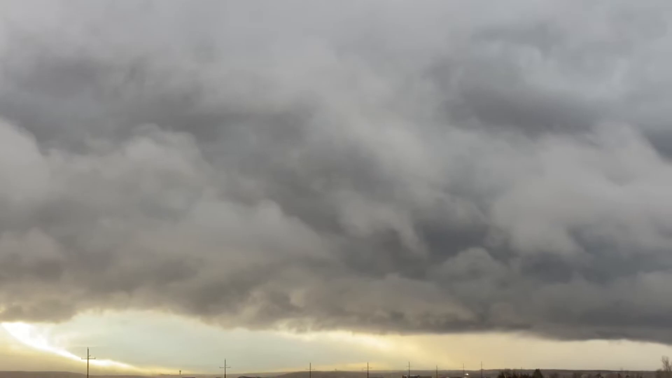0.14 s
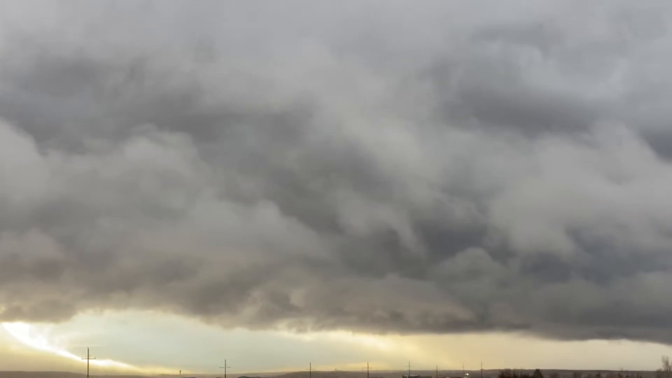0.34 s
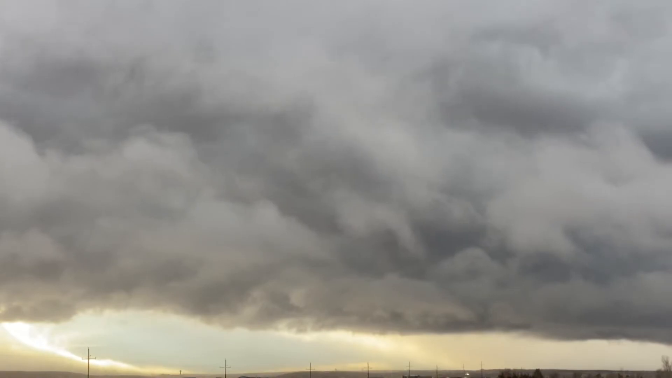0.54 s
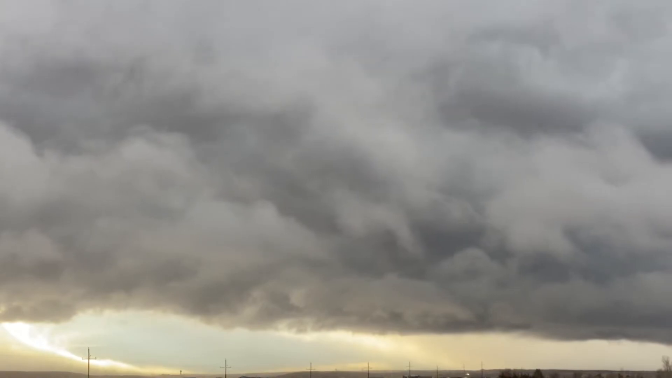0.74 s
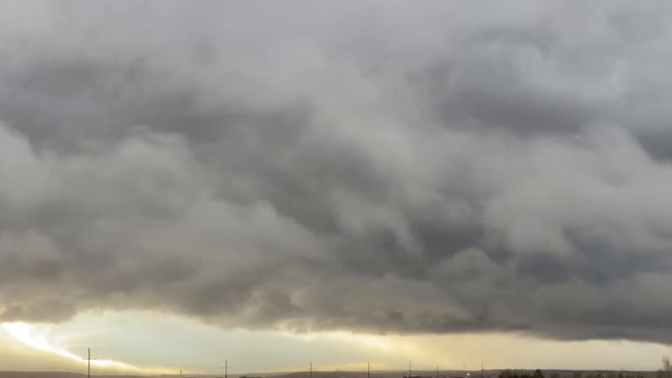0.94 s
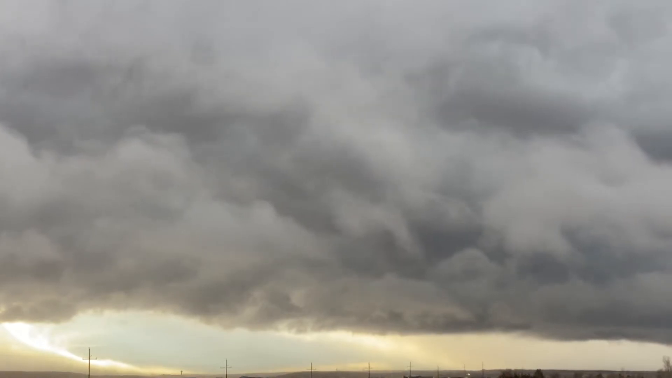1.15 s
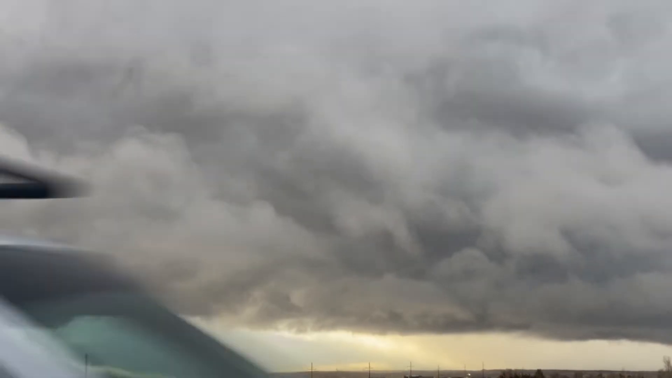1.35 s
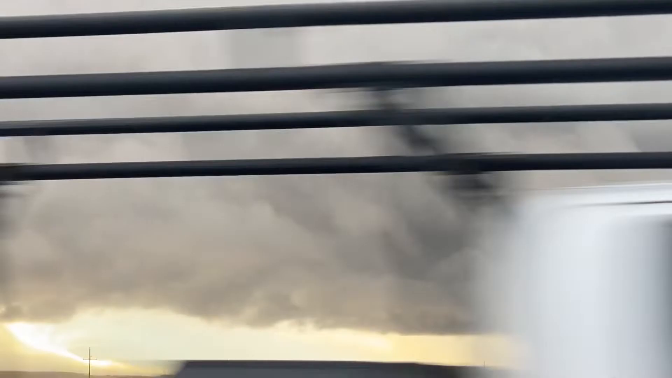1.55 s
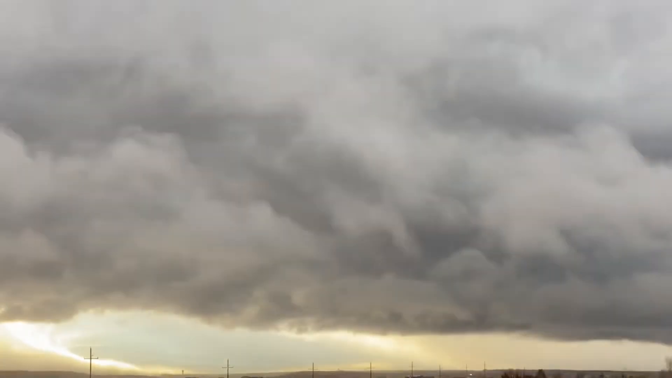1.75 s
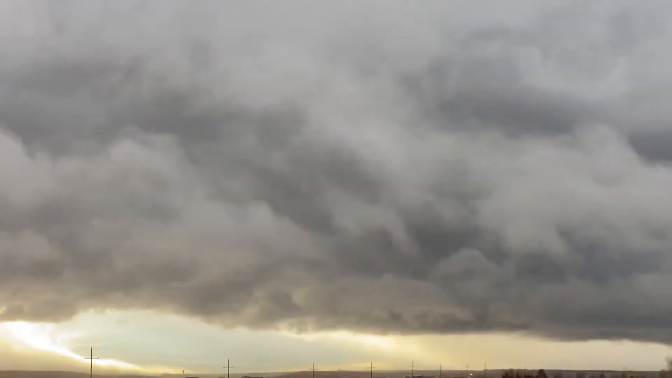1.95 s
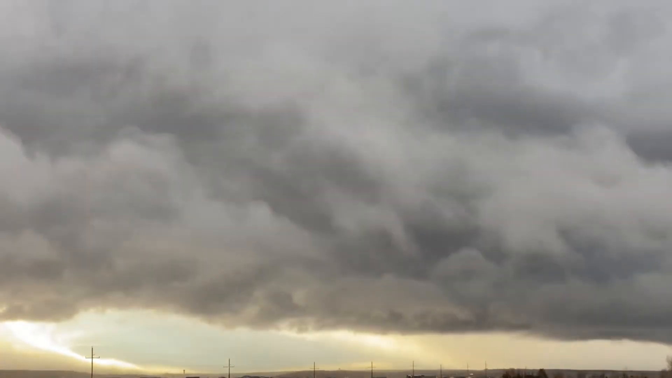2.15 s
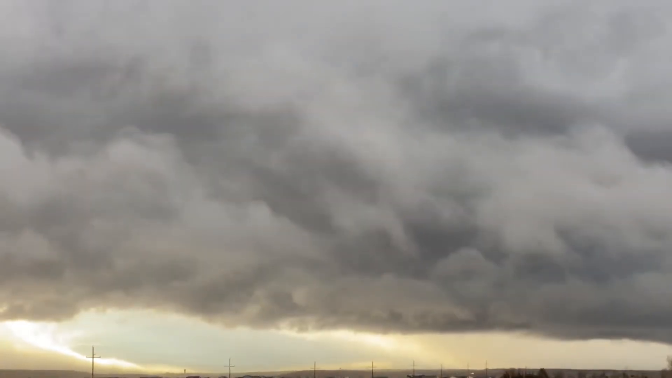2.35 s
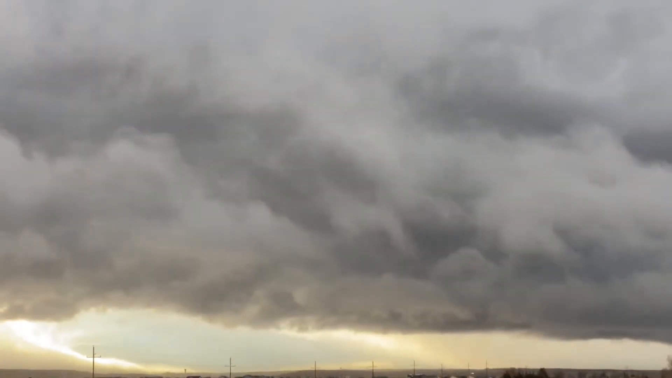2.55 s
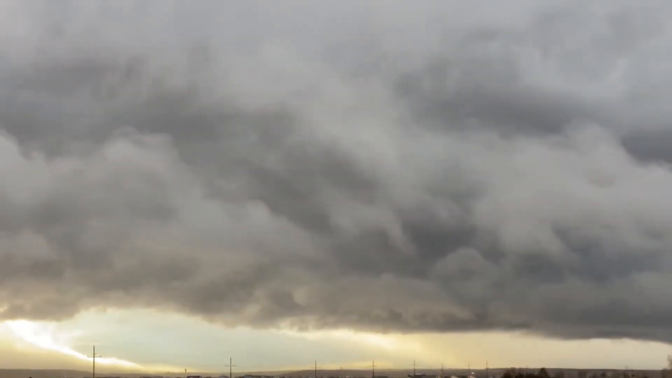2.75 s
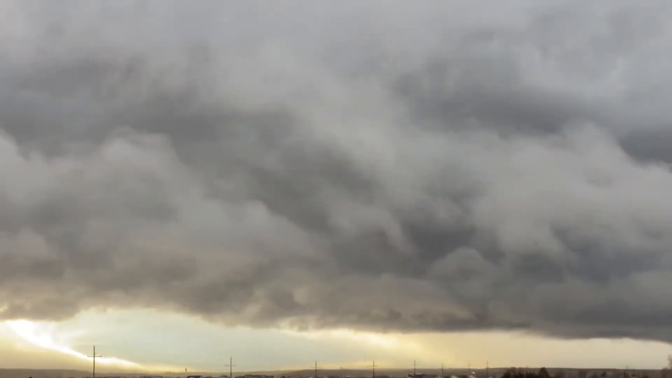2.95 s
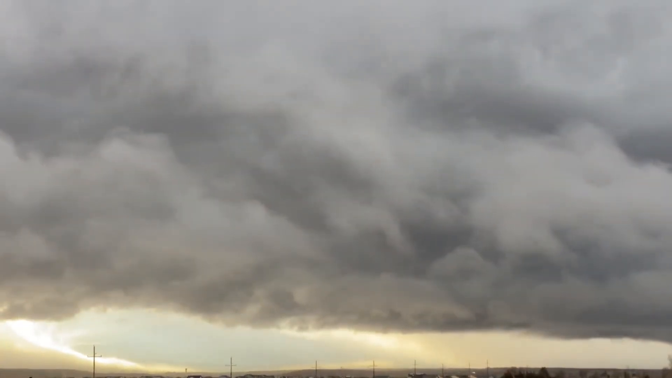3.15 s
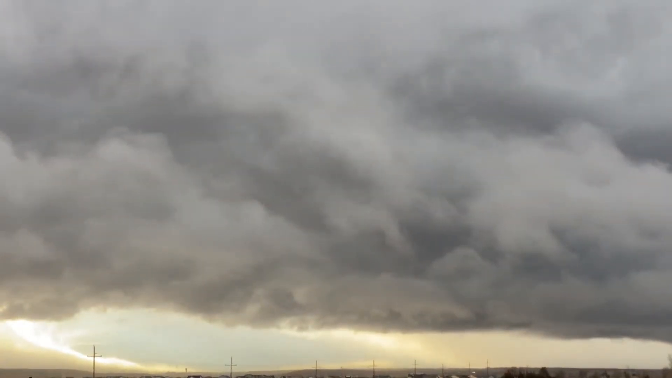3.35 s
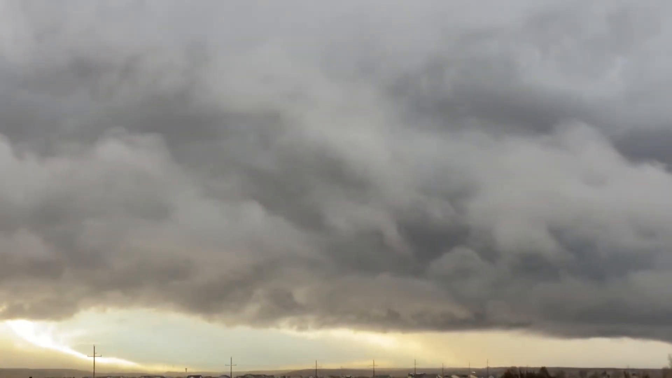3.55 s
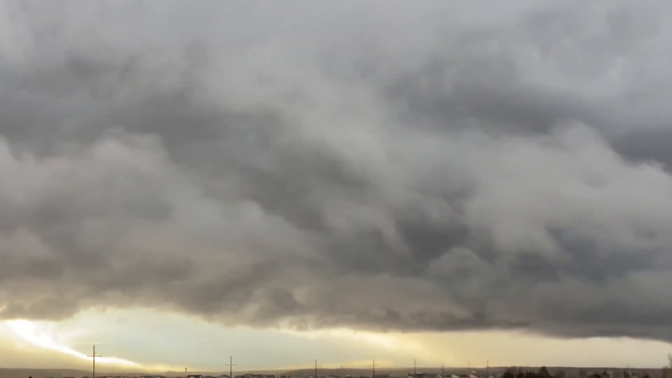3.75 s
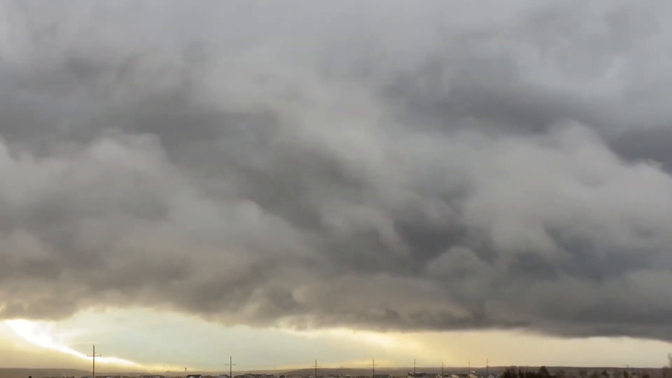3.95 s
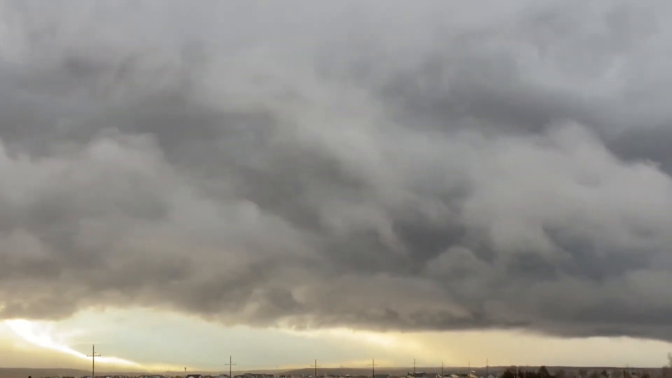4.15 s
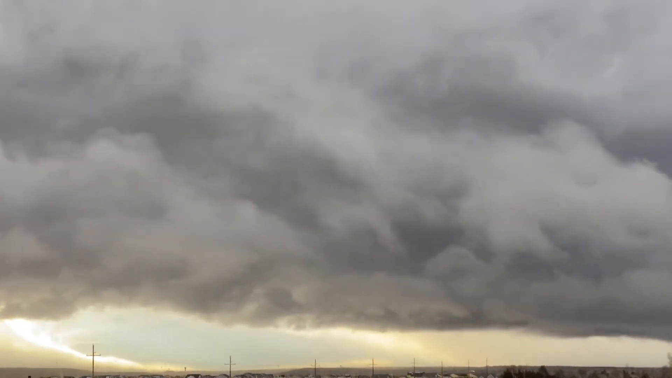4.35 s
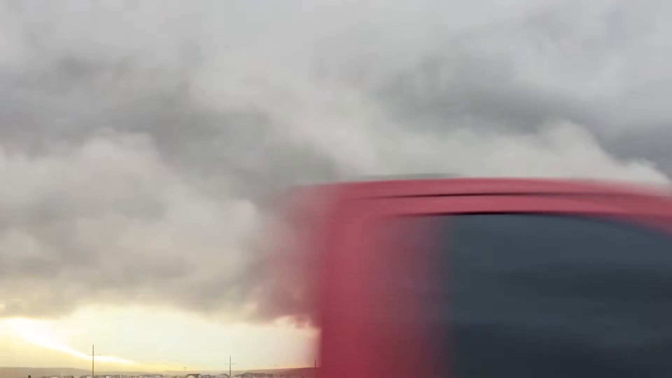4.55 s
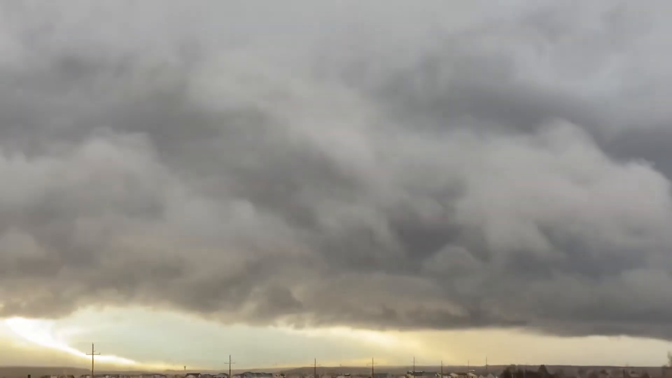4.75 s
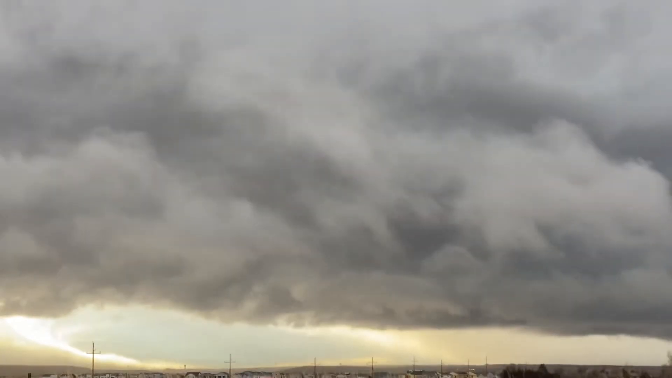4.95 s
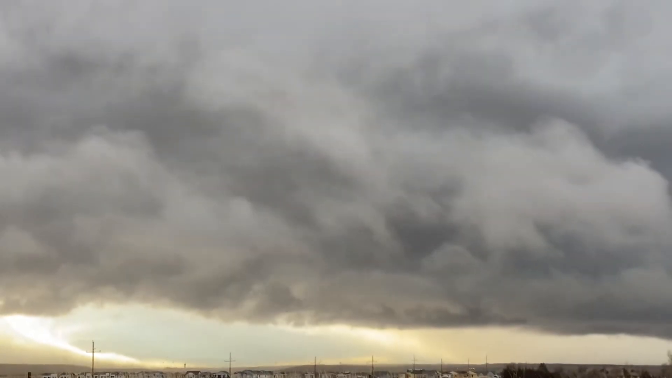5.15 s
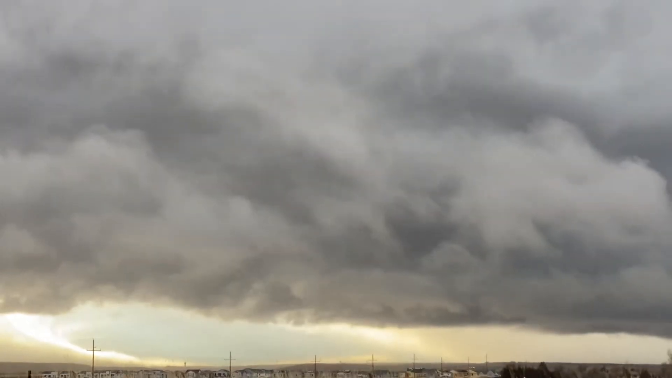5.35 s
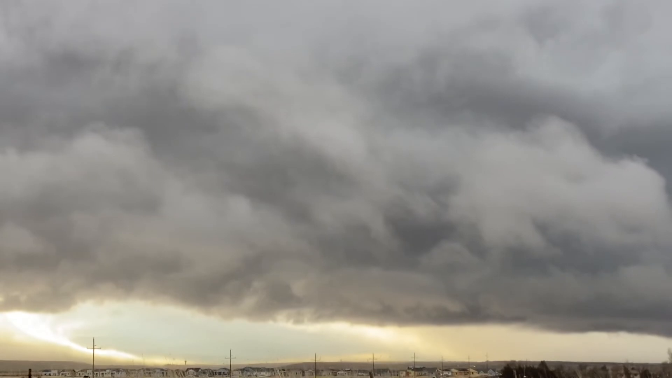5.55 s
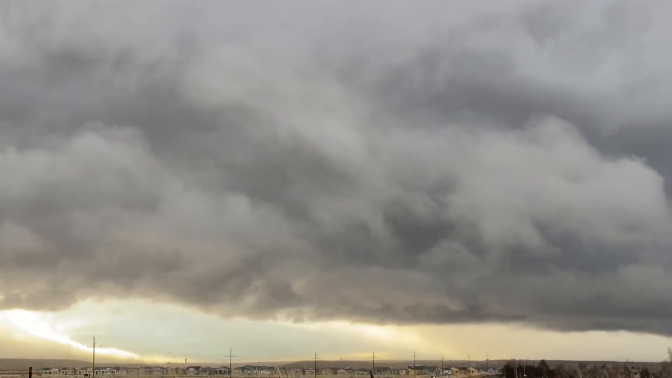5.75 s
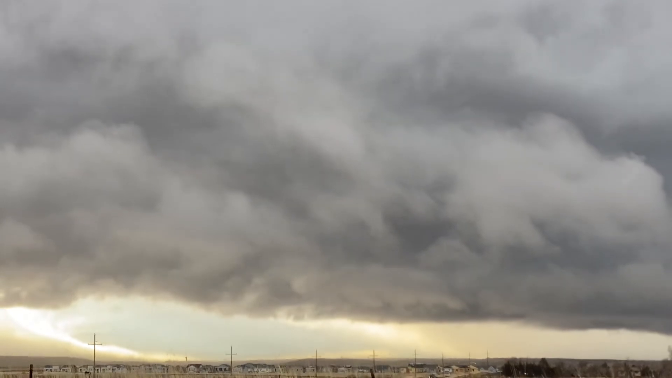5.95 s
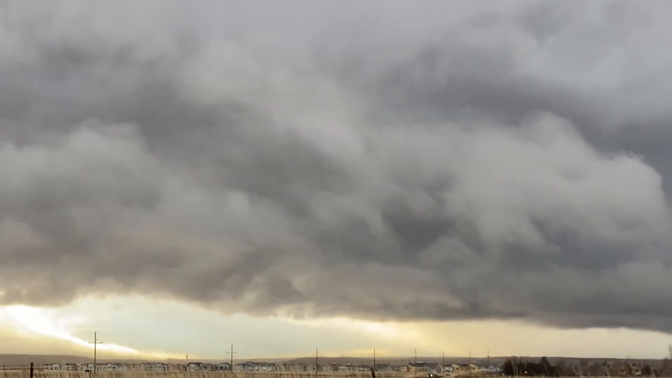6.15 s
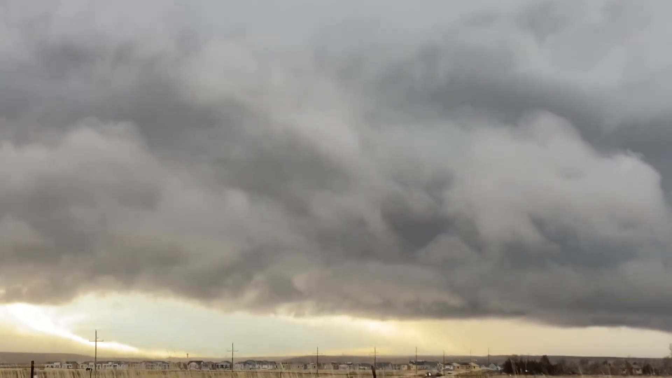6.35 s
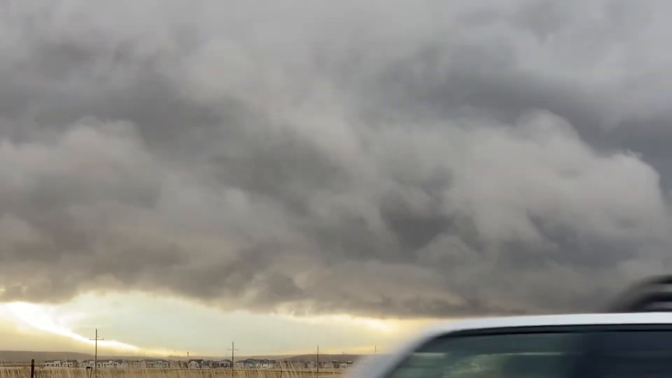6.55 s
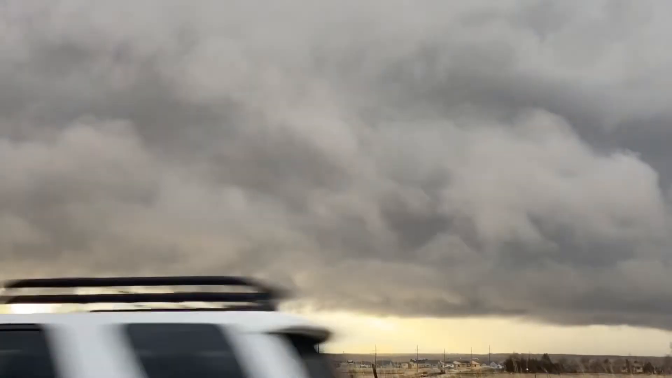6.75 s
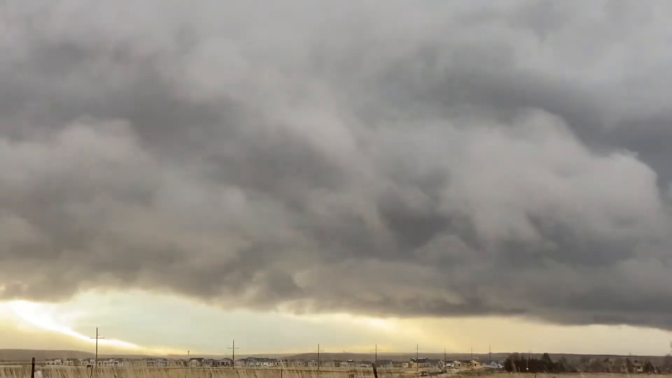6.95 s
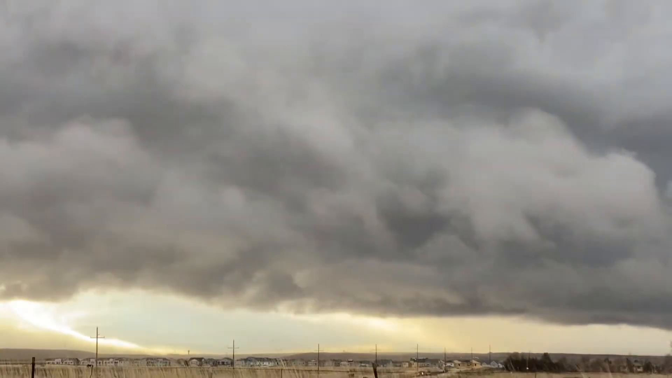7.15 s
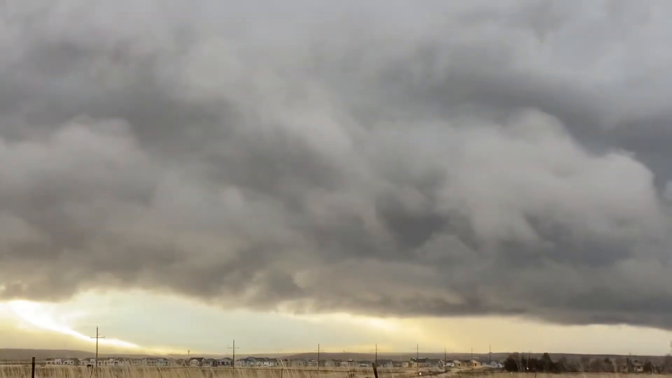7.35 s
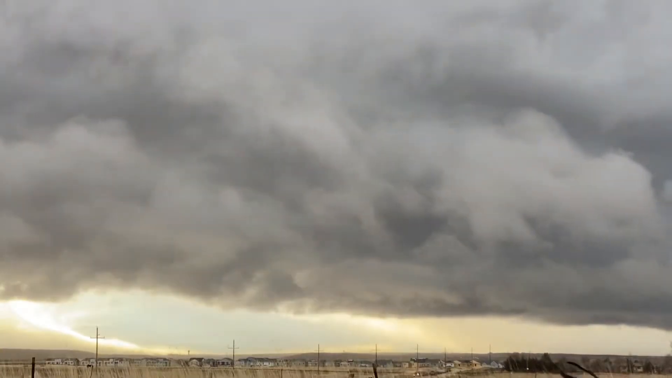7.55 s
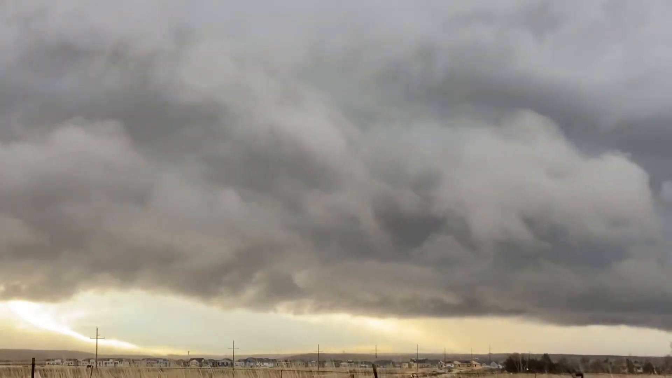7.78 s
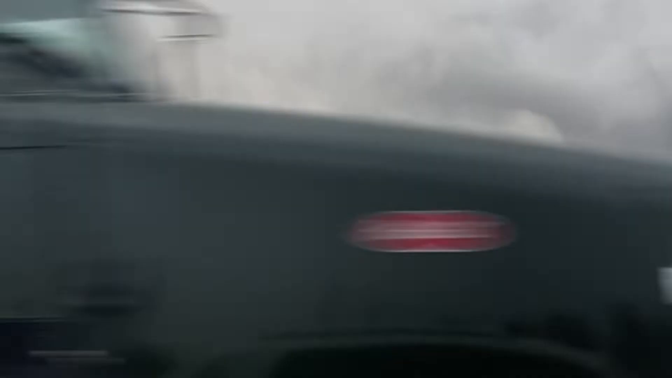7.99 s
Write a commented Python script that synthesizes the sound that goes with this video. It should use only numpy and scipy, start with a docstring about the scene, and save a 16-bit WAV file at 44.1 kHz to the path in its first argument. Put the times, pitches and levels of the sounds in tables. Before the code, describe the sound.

Windy open country beside a road, heard in stereo from a microphone close to the near lane. Soft wind knocks and a faint hollow traffic wash open under a growing tyre roar. A van rushes from left to right at about 1.5 s, with a low drone, a brief metallic stone ping and ticks of grit; swirling air and a low boom trail off. From 2 to 3.2 s gusts thud and knock against the microphone. A V8 hum rises from 3.5 s, bursting into a very loud boom around 4.5-4.7 s as the car passes rightwards; the level is clamped down for about a second. Its pitch falls and drops sharply with an upshift near 5.2 s, then it burbles away by 6.2 s. A softer car passes right to left around 6.5 s, fading slowly with a faint hum. Low wind remains, then a truck's roar and hiss swell rapidly, cutting off at its arrival around 8 s.

```python
"""Four vehicles come by a roadside microphone in windy open country, where gusts thump before and after
the first: a van, a car with a loud V8 that shifts up as it leaves, a car in the far lane going the other
way, and a truck just arriving. Tyres are coloured noise that swells and moves from side to side; engines
are wavering tones on multiples of the engine cycle; wind, grit and passing air are shaped noise, and each
thump is a short pressure swing. The V8 is so loud that the recorder turns everything down for about a second."""
import sys
import numpy as np
from scipy import signal
from scipy.fft import rfft, irfft, next_fast_len
from scipy.io import wavfile
from scipy.ndimage import uniform_filter1d, minimum_filter1d, map_coordinates

SR = 44100
rng = np.random.default_rng(int(sys.argv[2]) if len(sys.argv) > 2 else 0)


def log_audio(samples):
    """Write samples as a 16-bit WAV file to the path given in sys.argv[1]."""
    # one column per channel
    frames = np.atleast_2d(samples).T
    # limit to full scale, then quantise
    limited = np.clip(frames, -1, 1)
    pcm = np.round(limited * 32767).astype(np.int16)
    wavfile.write(sys.argv[1], SR, pcm)


N = 353637

# The passes: abreast t/s, time to cover its own distance from the microphone t/s, heading (+1 = to the right),
# body level/dB, tyres peak early by t/s, fade time as a multiple of swell time,
# roar level/dB, hiss level/dB (both before the trims in tyres), hiss swell t/s
PASSES = [(1.46, 0.19, 1, 0.5, 0.024, 0.99, -20, -44, 0.35),
          (4.52, .17, 1, -1, 0.057, 0.79, -16, -35.5, 0.19),
          (6.55, 0.25, -1, -12.5, 0.29, 2.96, -28.5, -52.5, 0.36),
          (8.1, 0.26, 1, -13, 0.0056, 1, -21.5, -35, 0.22)]
# Left channel against right, for sound from the left, abreast and right: f/Hz, left leads by/rad, left louder by/dB
LEFT_PORTS = [(60, .1, 0), (430, .45, -1), (540, 1.1, 0), (700, .9, -1), (850, 1.7, 3), (980, 1.2, 4),
              (1200, 2.9, 2), (1530, 5.75, -3), (1850, 5.6, -2), (2080, 6.283, 0)]
ABREAST_PORTS = [(100, 0, 0), (400, -.2, -1), (1100, .4, -1), (1750, -.5, -1), (2080, 0, 0)]
RIGHT_PORTS = [(60, -.1, 0), (300, -.7, 0), (480, -1.9, 2), (660, -2.5, 0), (800, -2.55, -3),
               (970, -2.35, -2), (1300, -2.65, -1), (1620, -2, -1), (1850, -.9, -3), (2080, 0, 0)]


def amp(db):
    """Decibels to gain."""
    return 10 ** (np.asarray(db) / 20)


def level_db(power):
    """Power to decibels."""
    return 10 * np.log10(power)


def unit(x):
    """Scale to rms 1."""
    return x / np.sqrt(np.mean(x ** 2) + 1e-20)


def along(points, hz):
    """Interpolate (f/Hz, value) points on a log frequency axis."""
    f, v = np.transpose(points)
    return np.interp(np.log(hz + 1), np.log(f + 1), v)


def clock():
    """The time of each sample in seconds."""
    return np.arange(N) / SR


def curves(rows):
    """One value per sample for each column after the time."""
    s, *columns = np.transpose(rows)
    return [np.interp(clock(), s, column) for column in columns]


def bell(s, length):
    """A smooth rise to 1 at s and back, down to 1/e after length seconds."""
    return np.exp(-((clock() - s) / length) ** 2)


def wobble(rate):
    """A smooth random curve with rate knots a second."""
    knots = rng.standard_normal(int(N * rate / SR) + 4)
    return map_coordinates(knots, [np.arange(N) * rate / SR])


def filtered(x, response):
    """Pass x through a complex response of frequency."""
    m = next_fast_len(N + SR // 4)
    return irfft(rfft(x, m) * response(np.fft.rfftfreq(m, 1 / SR)), m)[..., :N]


def ports(lead, hz):
    """Left and right responses for a phase lead and a level difference, half on each side."""
    rows, sides = np.array(lead), np.array([[.5], [-.5]])
    louder_db = along(rows[:, ::2], hz) if rows.shape[1] > 2 else 0
    return np.exp(1j * along(rows[:, :2], hz) * sides) * amp(louder_db * sides)


def rush(spectrum):
    """Coloured stereo noise of rms 1, least alike in the middle range: mid and side share the power."""
    # Likeness of the two channels: f/Hz, correlation
    likeness = [(50, .92), (150, .96), (500, .88), (1000, .84), (1250, .7), (1600, .62), (2150, .99),
                (4000, .999)]

    def mid_side(hz):
        turn = np.arccos(np.clip(along(likeness, hz), 0, 1)) / 2
        return amp(along(spectrum, hz)) * [np.cos(turn), np.sin(turn)]

    mid, side = filtered(rng.standard_normal((2, N)), mid_side)
    return unit(np.array([mid + side, mid - side]))


def passing(s, swell_s, db, falloff, linger=1):
    """Power of a source on a straight line, nearest at s; falloff 1 is the inverse square of distance."""
    t = clock() - s
    place = t / np.where(t < 0, swell_s, swell_s * linger)
    return amp(db) ** 2 / (1 + place ** 2) ** falloff


def bearings():
    """Power of the traffic from the left, abreast and the right, by inverse square of the distance."""
    power = np.zeros((3, N))
    for s, pace, heading, db, *_ in PASSES:
        place = np.sign(heading) * (clock() - s) / pace
        near = 1 / (1 + place ** 2)
        sides = np.array([(1 - near) * (place < 0), near, (1 - near) * (place > 0)])
        power += amp(db) ** 2 * near * sides
    return power


def placed(x, shares):
    """A low sound follows the traffic from side to side by the phase and level between the channels."""
    views = zip(shares, [LEFT_PORTS, ABREAST_PORTS, RIGHT_PORTS])
    return sum(share * filtered(x, lambda hz: ports(lead, hz)) for share, lead in views)


def distant():
    """Far tyres leave a hollow, steady wash between the passes, set to the right."""
    # Traffic far up the road: f/Hz, relative level/dB per Hz
    wash_colour = [(300, -50.5), (1000, -9.5), (1250, -2.5), (1550, 3.5), (1850, -3.5), (2000, -7),
                   (2250, -5), (2800, -22), (6000, -41.5), (16000, -82.5)]
    wash = filtered(rush(wash_colour), lambda hz: ports(RIGHT_PORTS, hz))
    return amp(-46.0 + 0.53 * wobble(3)) * wash


def wind():
    """Lumpy low noise: air buffets the microphone and comes and goes with the gusts."""
    # Gusts, and buffeting behind the vehicles: t/s, half length/s, level/dB before the trim below
    gust_rows = [(0.662, 0.22, -40), (1.797, 0.16, -30), (2.32, 0.2, -33), (3.038, 0.24, -32),
                 (3.497, 0.3, -34.5), (5.152, 0.25, -32), (6.796, 0.19, -44.5), (7.933, 0.35, -33)]
    # Buffeting at the microphone: f/Hz, relative level/dB per Hz
    rumble_colour = [(20, -23), (40, -3.5), (70, 2.5), (130, -2), (250, -4.5), (400, -22), (900, -43),
                     (4000, -120)]
    breeze = amp(-41 + 1.5 * wobble(5)) ** 2  # steady buffeting with a slow swing
    gusts = sum((amp(db) * bell(s, length)) ** 2 for s, length, db in gust_rows)
    buffet_db = level_db(breeze + gusts)
    lumps = amp(1.6 * wobble(14))
    return amp(buffet_db + 6.5) * lumps * rush(rumble_colour)


def thumps():
    """Each eddy is a brief pressure swing at the microphone: small ones knock, large ones thud."""
    # Eddies: t/s, f/Hz, peak level/dB before the bass leans to the right
    eddies = [(0.162, 330, -18), (0.171, 115, -20), (0.668, 330, -21), (0.675, 140, -19), (2.035, 115, -12),
              (2.214, 500, -22.5), (2.227, 175, -13.5), (2.279, 210, -12.5), (2.289, 500, -25.5),
              (2.29, 115, -17), (2.301, 95, -19), (2.343, 230, -10.5), (2.366, 210, -18), (2.382, 330, -21),
              (2.388, 560, -22), (2.402, 95, -14), (2.802, 270, -12), (2.817, 110, -10.5),
              (2.925, 110, -17), (3.04, 85, -17), (3.162, 80, -16.5)]
    cycles = .95  # swings either way until the eddy has fallen to 1/e
    return sum(amp(db) * bell(s, cycles / hz) * np.cos(2 * np.pi * hz * (clock() - s))
               for s, hz, db in eddies)


def slipstream(roar_db, closeness):
    """Bodies in the near lane tear the air into a low whoosh; its deepest part trails behind."""
    # Air torn by a passing body: f/Hz, relative level/dB per Hz
    body_colour = [(30, -27), (80, -15), (150, -3.5), (270, 1), (420, -4), (600, -21.5), (1200, -46.5),
                   (4000, -120)]
    # Large eddies behind it: f/Hz, relative level/dB per Hz
    trail_colour = [(20, -19.5), (45, -9), (80, 2), (140, -1), (220, -12), (400, -41.5), (900, -120)]
    body_db, trail_db, trail_lag_s = -1.8, -6.5, .14  # levels against the swell
    swell = amp(roar_db + 0.44 * wobble(17)) * closeness ** 0.25
    trailing = np.interp(clock() - trail_lag_s, clock(), swell)
    return amp(body_db) * swell * rush(body_colour) + amp(trail_db) * trailing * rush(trail_colour)


def wakes():
    """Swirling air follows the close passes in a short, uneven whoosh."""
    # Wakes in the near lane: t/s, half length/s, level/dB
    wake_rows = [(1.692, 0.16, -29), (4.717, 0.18, -27)]
    # Swirling air: f/Hz, relative level/dB per Hz
    swirl_colour = [(150, -9), (350, -2.5), (800, 3.5), (1300, -6), (2200, -9), (3500, -13.5),
                    (7000, -29.5), (15000, -43.5)]
    swell = sum(amp(db) * bell(s, length) for s, length, db in wake_rows)
    return swell * amp(2.8 * wobble(25.18)) * rush(swirl_colour)


def grit():
    """Flung stones tick around the van: decaying noise bands at each stone's pitch and a bright crack."""
    # Landings: t/s, stone f/Hz, stone level/dB, crack f/Hz, crack level/dB
    landings = [(0.829, 2200, -30, 4560, -47.5), (1.87, 3260, -35, 9800, -42),
                (2.039, 2700, -39, 7560, -46), (2.507, 2350, -45, 7800, -53), (2.785, 3000, -48, 7000, -47)]
    spread, t60_s = 1.2, .05  # band edges as a ratio to the centre, time to fall by 60 dB
    ticks, t = np.zeros(N), np.arange(SR // 20) / SR
    for s, hz, db, crack_hz, crack_db in landings:
        for centre, level in [(hz, db), (crack_hz, crack_db)]:
            band = signal.butter(2, [centre / spread, centre * spread], "band", fs=SR, output="sos")
            ring = unit(signal.sosfilt(band, rng.standard_normal(len(t))))
            ticks[round(s * SR):][:len(t)] += amp(level - 60 * t / t60_s) * ring
    return ticks


def ping():
    """One stone strikes metal under the van, which rings briefly as a decaying sine."""
    s, hz, db = 1.448, 5040, -25
    t60_s, attack_s = .04, .002
    t = np.maximum(clock() - s, 0)
    return amp(db - 60 * t / t60_s) * (1 - np.exp(-t / attack_s)) * np.sin(2 * np.pi * hz * t)


def narrow_bands():
    """Narrow noise bands of tread, bodywork and swirling air swell, glide and fade."""
    # Bands: t/s, half length/s, f/Hz, width/Hz, level/dB, glide/Hz per s
    bands = [(0.952, 0.33, 680, 300, -34.5, 0), (1.45, 0.11, 5010, 900, -40.5, 1.5),
             (3.954, 0.36, 894.5, 200, -31, 0), (4.56, 0.19, 1161, 302, -22.5, 400.5),
             (4.689, 0.036, 946, 221.3, -19, 0), (4.81, 0.063, 770, 161, -26.5, 500.5),
             (4.745, .12, 1906, 650, -31.5, 3000), (4.988, 0.082, 2900, 650, -45, 3199.5),
             (4.99, 0.081, 861, 220, -43, -0.5), (6.248, 0.39, 2050, 895, -40, 0),
             (6.2, 0.22, 3380, 1098, -48, 1), (6.538, 0.31, 690, 328.6, -29, -0.5),
             (7.598, 0.9, 97.8, 43.2, -34, -0.5), (7.76, 0.15, 573.7, 170, -27, 0),
             (8.012, 0.083, 2020, 800, -30, -0.5), (8, 0.11, 1274, 80, -33, 2),
             (8, 0.09, 3840, 190, -38, -3), (8, 0.12, 5130, 300, -45, 0), (8, 0.073, 6450, 302, -45, 0)]
    sound = np.zeros(N)
    for s, length, hz, width, db, glide in bands:
        a, b = filtered(rng.standard_normal((2, N)), lambda f: 1 / (1 + (2 * f / width) ** 2))
        turn = 2 * np.pi * np.cumsum(hz + glide * (clock() - s)) / SR
        sound += amp(db) * bell(s, length) * unit(a * np.cos(turn) + b * np.sin(turn))
    return sound


def road():
    """Tyre roar and air hiss in dB: every vehicle adds a swell, and the hiss carries less far."""
    roar, hiss = amp(-45) ** 2, amp(-63) ** 2  # the rest of the road
    roar_reach = 1.957  # the roar carries this many times the passing distance
    roar_falloff, hiss_falloff = 1.885, 1.74  # above inverse square, for the ground soaks up more
    for s, pace, _, _, early_s, linger, roar_db, hiss_db, hiss_s in PASSES:
        roar = roar + passing(s - early_s, roar_reach * pace, roar_db, roar_falloff, linger)
        hiss = hiss + passing(s - early_s, hiss_s, hiss_db, hiss_falloff, linger)
    return level_db(roar), level_db(hiss)


def hollowed(x, share):
    """Hiss from far to the right arrives with a close reflection, which combs it."""
    delay_s, reflection_gain = .00093, .42
    echo = filtered(x, lambda hz: np.exp(-2j * np.pi * hz * delay_s))
    gain = reflection_gain * share ** 2
    return (x + gain * echo) / np.sqrt(1 + gain ** 2)


def tyres(roar_db, hiss_db, shares, closeness):
    """Tread roar changes colour and side as each vehicle goes by; air hiss swells and brightens close up."""
    # Tyre roar from the left, abreast and the right: f/Hz, relative level/dB per Hz
    left_colour = [(40, -41.5), (110, -10), (260, -2), (400, -2.5), (500, -2), (600, 1.5), (740, 1),
                   (860, -2.5), (1000, -4), (1200, -14.5), (1600, -15.5), (1900, -17), (2400, -21.5),
                   (3200, -29), (6000, -58), (16000, -87.5)]
    abreast_colour = [(40, -20), (110, 4.5), (260, -2.5), (400, -5), (500, 0), (600, 0), (740, 3),
                      (950, -8), (1200, -10), (1450, -15), (1800, -13.5), (2400, -16.5), (3200, -22.5),
                      (6000, -30), (16000, -89.5)]
    right_colour = [(40, -35), (110, 3.5), (260, -6), (400, -6), (500, -5), (620, -5), (740, -2), (950, -6),
                    (1200, -14), (1450, -10), (1800, -19.5), (2400, -25.5), (3200, -29), (6000, -48.5),
                    (16000, -99.5)]
    # Air hiss: f/Hz, relative level/dB per Hz
    hiss_colour = [(500, -57.5), (1200, -23.5), (2600, -1.5), (3600, -1), (5000, -3), (7000, -6),
                   (10000, -15.5), (13000, -24.5), (15500, -28.5)]
    # Spray of fine air noise close up: f/Hz, relative level/dB per Hz
    fizz_colour = [(1000, -64.5), (3000, -22), (6000, -2.5), (9000, -2), (15500, -10)]
    fizz_lead_s = 0.044  # the finest spray is thrown forwards, so it peaks before the hiss
    views = [(left_colour, LEFT_PORTS, 1.5), (abreast_colour, ABREAST_PORTS, 2),
             (right_colour, RIGHT_PORTS, 1.8)]  # colour, ports, trim/dB
    roar = sum(np.sqrt(share) * amp(db) * filtered(rush(colour), lambda hz: ports(lead, hz))
               for share, (colour, lead, db) in zip(shares, views))
    flutter = wobble(22)  # turbulent air on the way
    hiss = amp(hiss_db + 2.4 + .5 * flutter) * rush(hiss_colour)
    near_hiss = amp(hiss_db) * closeness ** 0.31  # air soaks up the spray over distance
    spray = np.interp(clock() + fizz_lead_s, clock(), near_hiss)
    fizz = amp(2.0 + 1.0 * wobble(4.7)) * spray * rush(fizz_colour)
    return amp(roar_db + 0.72 * flutter) * roar + hollowed(hiss + fizz, shares[2])


def exhaust(firing_hz, orders, count, waver_db, jitter):
    """Tones on multiples of the cycle of an engine with count cylinders, each wavering by itself."""
    turn = 2 * np.pi * np.cumsum(firing_hz * (1 + jitter * wobble(30))) / count / SR
    return sum(amp(db + waver_db * wobble(7)) * np.sin(round(k) * turn + rng.uniform(0, 2 * np.pi))
               for k, db in orders)


def heard(rows):
    """Fade an engine in and out at the ends of its table."""
    return np.clip(np.minimum(clock() - rows[0][0], rows[-1][0] - clock()) / 0.15, 0, 1)


def far_car():
    """The car in the far lane hums on its firing tone."""
    # Far car: t/s, firing f/Hz, level/dB before the trim below
    hum_track = [(6.1, 180, -21.5), (6.35, 181.2, -27.5), (6.7, 177.8, -26), (7, 174.2, -29),
                 (7.3, 169, -44), (7.6, 172, -52)]
    firing_hz, hum_db = curves(hum_track)
    hum = exhaust(firing_hz, [(1, 0.0014)], count=1, waver_db=2.0, jitter=0.0057)
    return heard(hum_track) * amp(hum_db - 1.0) * hum


def van():
    """The van drones on high multiples of its engine cycle and, once it shows its tail, booms on low ones."""
    # Van: t/s, engine cycle f/Hz, drone level/dB, boom level/dB
    van_track = [(1.05, 26.48, -41, -46), (1.27, 26.52, -21, -29), (1.41, 26.6, -16, -28),
                 (1.56, 26.28, -14, -18.5), (1.68, 25.8, -16, -18), (1.87, 25.28, -27, -24),
                 (2.1, 25.1, -29.5, -31.5), (2.4, 24.9, -42, -38)]
    # Uneven beat of the drone and of the boom: multiple of the engine cycle, relative level/dB
    drone_orders = [(9, -1.5), (10, -8.5)]
    boom_orders = [(3, 0), (5, -4), (7, -12)]
    cycle_hz, drone_db, boom_db = curves(van_track)
    drone = amp(drone_db) * exhaust(cycle_hz, drone_orders, count=1, waver_db=2.5, jitter=0.0051)
    boom = amp(boom_db) * exhaust(cycle_hz, boom_orders, count=1, waver_db=2.5, jitter=0.0051)
    return heard(van_track) * (drone + boom)


def v8_levels():
    """The firing tone leaps up once the tailpipe is in view, fades with distance and dips for the upshift."""
    # Firing tone from the front, firing tone from the tailpipe, burble: loudest t/s, swell t/s, level/dB
    nose = (3.5, 0.83, -22.5)
    tailpipe = (4.635, 0.25, 2.5)
    burble = (4.48, 0.35, -15)
    falloff = 1.58  # above inverse square, for the ground soaks up more
    burble_lingers = 1.65  # it fades this many times more slowly, for the pipe points backwards
    opens_s, opening_s = 4.1, 0.17  # the body stops hiding the tailpipe
    shift_s, shift_length_s, shift_dip_db = 5.26, 0.17, 4  # the throttle lifts for the upshift
    in_view = np.clip((clock() - opens_s) / opening_s, 0, 1)
    nose_db = level_db(passing(*nose, falloff))
    tail_db = level_db(passing(*tailpipe, falloff))
    burble_db = level_db(passing(*burble, falloff, burble_lingers))
    boom_db = (1 - in_view) * nose_db + in_view * tail_db - shift_dip_db * bell(shift_s, shift_length_s)
    return boom_db, burble_db


def v8():
    """It booms on its firing tone; the burble changes colour as it turns its tail and after the upshift."""
    # The V8 pulls, drops in pitch as it goes by, shifts up and cruises: t/s, firing f/Hz
    v8_track = [(1.8, 183.6), (2.7, 198.3), (3.5, 207.7), (4.3, 219), (4.52, 221.7), (4.67, 216.7),
                (4.78, 204.7), (5.02, 198.7), (5.16, 163.8), (5.33, 131.2), (5.5, 120.4), (6.27, 120)]
    # Burble colour: t/s, stage (0 far off, 1 coming, 2 abreast, 3 leaving, 4 cruising)
    stage_track = [(3.2, 0), (3.7, 1), (4.05, 1), (4.27, 2), (4.5, 2), (4.7, 3), (5.1, 3), (5.35, 4)]
    # Uneven beat of the exhaust in each stage: multiple of the engine cycle, relative level/dB
    far_orders = [(3, -1), (5, -2), (6, 0), (10, 1.5), (11, -4), (13, 1.5), (16, -8)]
    coming_orders = [(3, -4.5), (5, 3.5), (6, -4.5), (10, -8), (11, -9), (13, -2), (14, -11), (16, -8)]
    abreast_orders = [(3, -5.5), (5, 2.5), (6, -13), (10, -5), (11, 0), (13, -4), (14, -13), (16, -10)]
    leaving_orders = [(3, -5), (5, 1.5), (10, -6), (11, -3), (12, -9), (13, -10)]
    cruising_orders = [(5, -6), (12, -3), (13, -10), (14, 0), (15, -8), (16, -3)]
    # Gas noise in each stage: level/dB against the burble level
    puff_levels = [-20, -17.5, -13.5, -1.5, -12.5]
    # Turbulent gas at the tailpipe: f/Hz, relative level/dB per Hz
    puff_colour = [(80, -120), (170, -32), (235, -3.5), (275, -5.5), (330, -11.5), (450, -19), (900, -120)]
    firing_hz, = curves(v8_track)
    boom_db, burble_db = v8_levels()
    boom = amp(boom_db) * exhaust(firing_hz, [(1, 0)], count=1, waver_db=.3, jitter=.002)
    stage, = curves(stage_track)
    stages = [far_orders, coming_orders, abreast_orders, leaving_orders, cruising_orders]
    gains, puff = {}, 0
    for i, (orders, puff_db) in enumerate(zip(stages, puff_levels)):
        share = np.maximum(0, 1 - np.abs(stage - i))  # crossfade between neighbouring stages
        puff = puff + share * amp(puff_db)
        for k, db in orders:
            gains[round(k)] = gains.get(round(k), 0) + share * amp(db)
    blend = [(k, level_db(gain ** 2 + 1e-12)) for k, gain in gains.items()]
    burble = exhaust(firing_hz, blend, count=8, waver_db=1.2, jitter=.002)
    gas = puff * rush(puff_colour)[0]
    return heard(v8_track) * (boom + amp(burble_db) * (burble + gas))


def scene():
    """Traffic and wind at the roadside; the bass leans a little to the right."""
    power = bearings()
    closeness = power.sum(axis=0)
    shares = power / closeness
    roar_db, hiss_db = road()
    engines = far_car() + van() + v8()
    low = placed(engines + slipstream(roar_db, closeness), shares) + wind() + thumps()
    leaning = low * amp([[-.6], [.6]])
    small_sounds = narrow_bands() + grit() + ping()
    return distant() + wakes() + small_sounds + tyres(roar_db, hiss_db, shares, closeness) + leaning


def gain_control(x):
    """The recorder turns a loud sound down, holds its gain there for a while, then recovers."""
    loudest_db, hold_s, recover_db_per_s = -6, 0.98, 67  # highest rms level, wait, recovery
    step = SR // 100
    power = np.abs(uniform_filter1d(np.mean(x ** 2, axis=0), size=SR // 12))[::step]
    gain_db, turned_s, gains = 0, 0, []
    for s, room_db in zip(clock()[::step], loudest_db - level_db(power + 1e-12)):
        if room_db < gain_db:
            gain_db, turned_s = room_db, s
        elif s > turned_s + hold_s:
            gain_db = min(0, room_db, gain_db + recover_db_per_s * step / SR)
        gains.append(gain_db)
    return x * amp(np.interp(clock(), clock()[::step], gains))


def limited(x):
    """The recorder turns down peaks that would pass its ceiling, with a smoothed gain."""
    ceiling = .95  # of full scale
    needed = np.minimum(1, ceiling / (np.abs(x).max(axis=0) + 1e-9))
    return x * uniform_filter1d(minimum_filter1d(needed, size=900), size=800)


def record(dry):
    """The microphone spreads the top treble; gain control, peak limiting and a band limit follow."""
    # Highest treble between the channels: f/Hz, left leads by/rad
    treble_spread = [(7450, 0), (7650, -1.3), (8500, -3.14), (9700, -6.28), (10350, -6.28), (12050, -9.42),
                     (13600, -12.57), (14400, -12.57), (15500, -15.7)]
    top_hz = 15600
    spread = filtered(dry, lambda hz: ports(treble_spread, hz))
    levelled = limited(gain_control(spread))
    return filtered(levelled, lambda hz: hz < top_hz)


dry = scene()
out = record(dry)
log_audio(out)
```